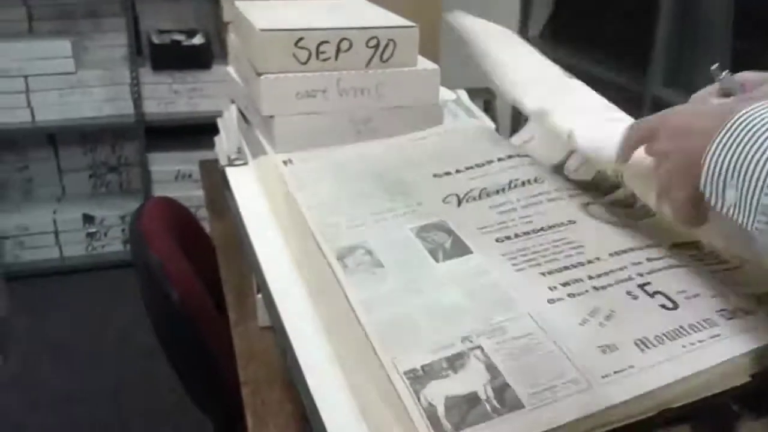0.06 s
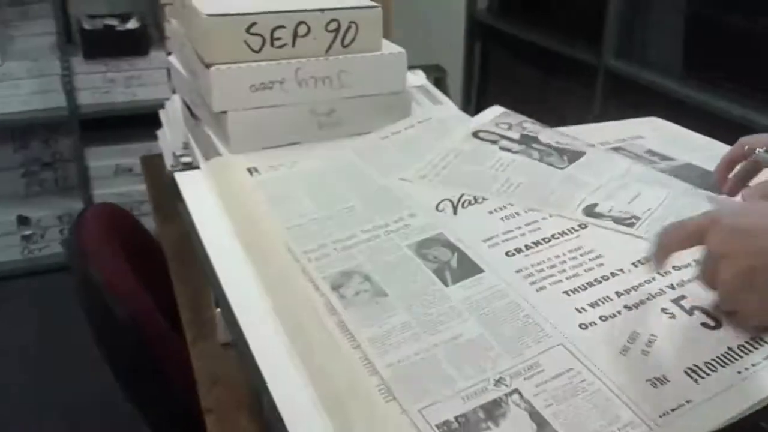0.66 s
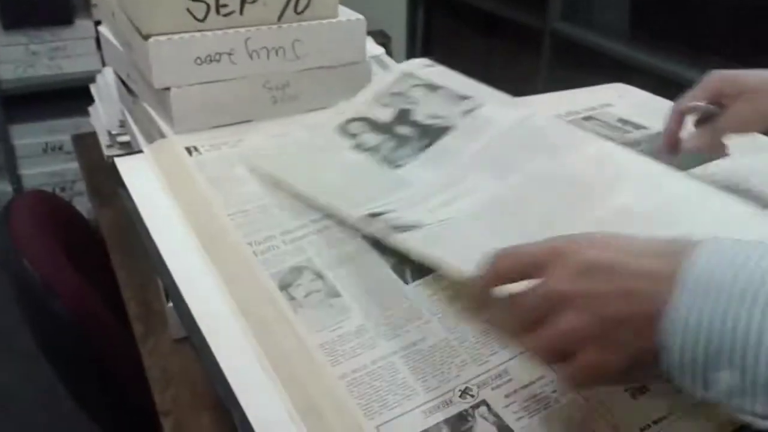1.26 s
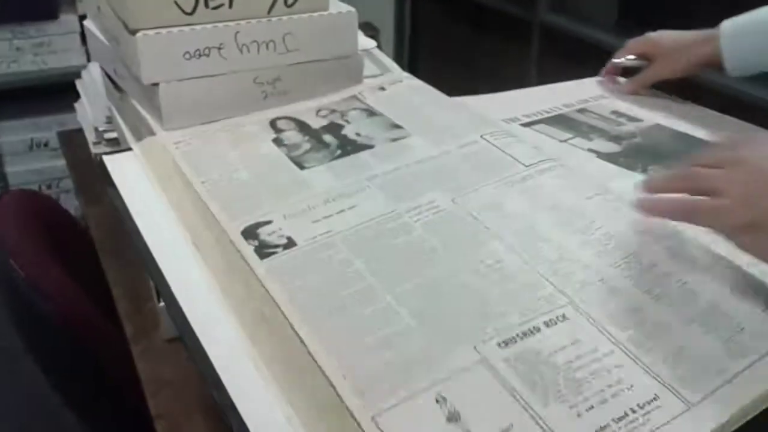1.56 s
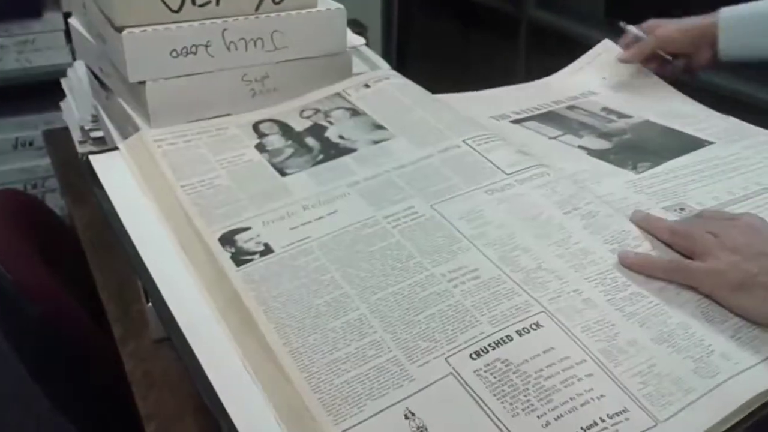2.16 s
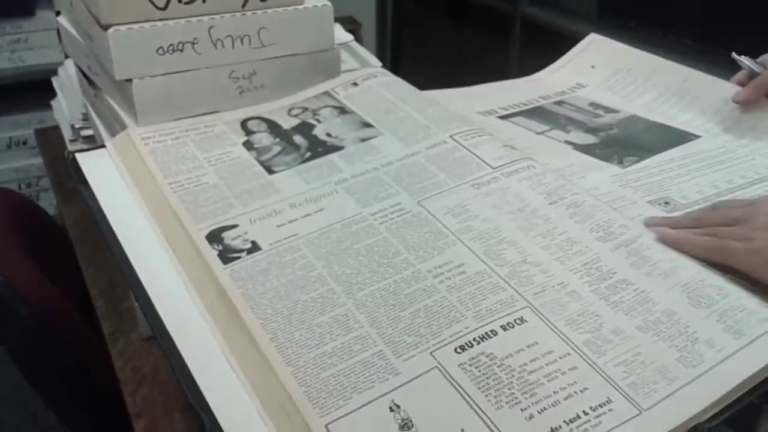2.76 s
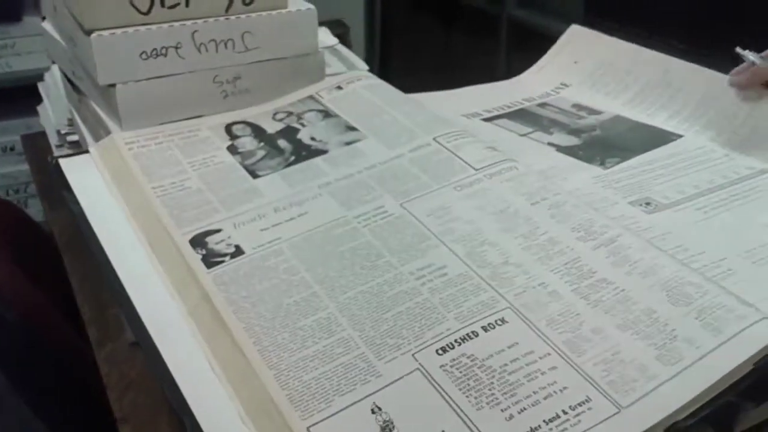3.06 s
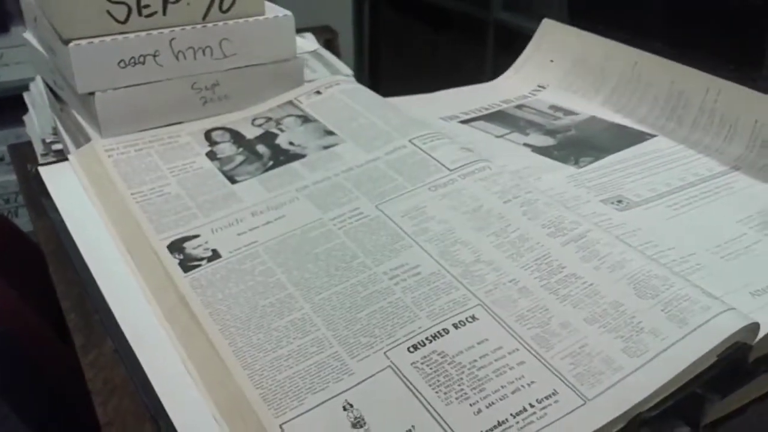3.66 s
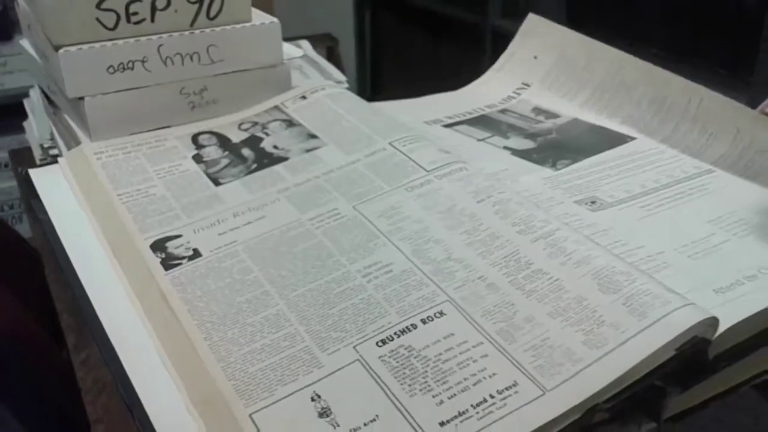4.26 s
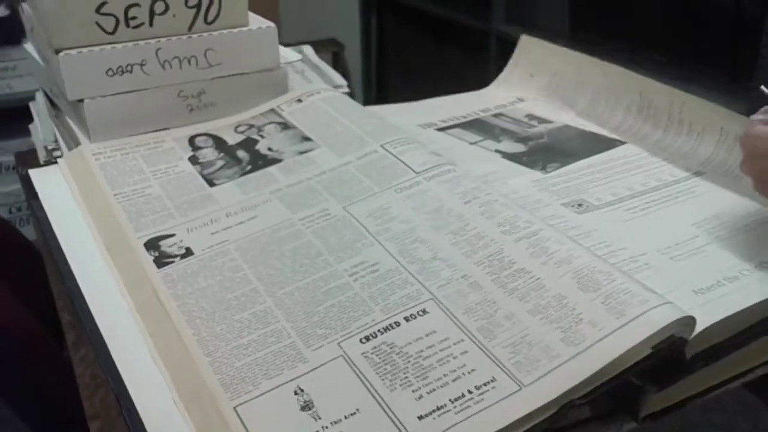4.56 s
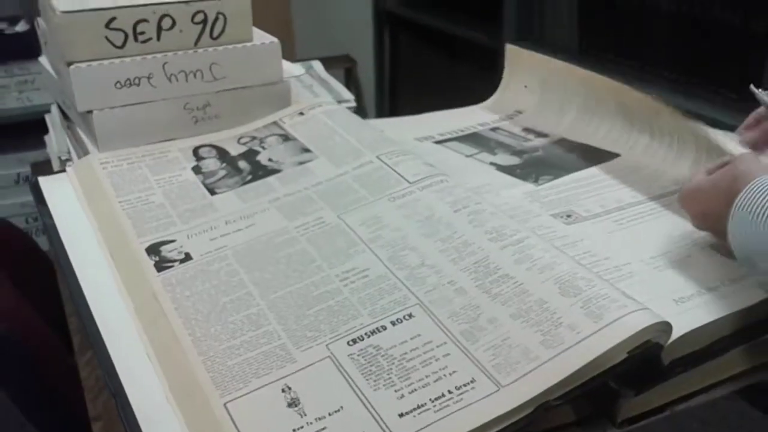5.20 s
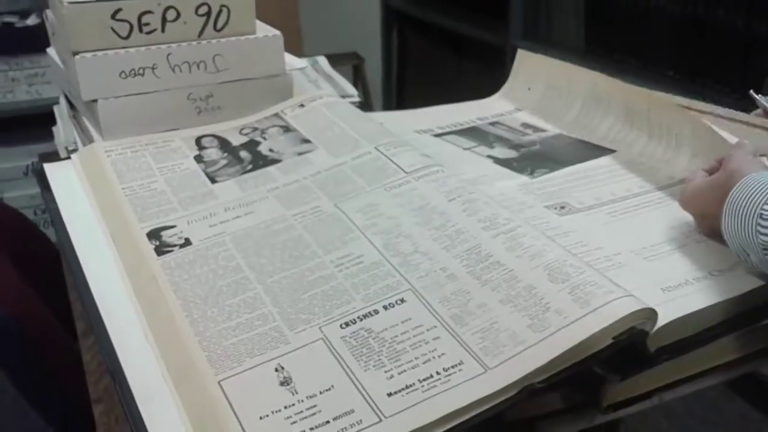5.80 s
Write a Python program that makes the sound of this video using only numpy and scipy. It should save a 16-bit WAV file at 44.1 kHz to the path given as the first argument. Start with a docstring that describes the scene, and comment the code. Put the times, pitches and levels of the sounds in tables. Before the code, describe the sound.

A large newspaper page is turned in a small, quiet room, crinkling and buckling with soft snaps before it settles with a puff of air. A hand slides faintly over the paper, and something hard taps lightly on a wooden stand. Near the end the camera is handled, and louder dry thumps, knocks, plastic ticks and finger rubs sound right at the microphone.

```python
"""Turning a newspaper page

In a small archive room a large page is lifted, buckles with soft snaps and settles on a bound volume.
A hand slides faintly over the newsprint and something hard clacks on the wooden stand.
Then a camera is handled: dry thumps, knocks and ticks come through its case, and skin rubs on it."""
import sys
import numpy as np
from scipy import signal
from scipy.fft import rfft, irfft, next_fast_len
from scipy.io import wavfile
from scipy.ndimage import uniform_filter1d, minimum_filter1d, map_coordinates

SR = 44100
rng = np.random.default_rng(int(sys.argv[2]) if len(sys.argv) > 2 else 0)


def master(y):
    """Save y as 16-bit WAV."""
    cut = np.clip(np.atleast_2d(y).T, -1, 1)
    pcm = np.round(cut * 32767)  # scale
    wavfile.write(sys.argv[1], SR, pcm.astype(np.int16))


N = 261821

# The gesture of the page turn (time [s], motion level [dB])
PAGE_MOTION = [(0.0, -40.5), (0.16, -32), (0.274, -35.5), (0.576, -43), (0.876, -44.5), (1.046, -41),
               (1.208, -33.5), (1.302, -32), (1.372, -35.5), (1.528, -44), (1.658, -52), (1.8, -82)]
# Hard bends of the sheet (start [s], hold [s], relative crinkle [dB], relative flap [dB])
BENDS = [(0.07, 0.11, -27, -33), (0.34, 0.091, -52, -31.5), (0.62, 0.0067, -29.5, -44),
         (0.773, 0.053, -43, -39.5), (0.994, 0.014, -36, -44), (1.085, 0.089, -38.5, -51),
         (1.309, 0.031, -32, -31.5), (1.375, 0.048, -45, -33.5), (1.633, 0.007, -64, -55)]
# Paper colours: hollow flap, crisp crinkle, sharp bite, low whoosh (frequency [Hz], gain [dB])
FLAP_EQ = [(250, -18.5), (430, -11.5), (520, 0.5), (600, 7), (710, -5), (880, 4), (1130, 6), (1350, -8),
           (1600, -14), (2000, -17), (3000, -28)]
CRINKLE_EQ = [(900, -34), (1500, 6), (1950, -5), (2400, 3.5), (2850, 0.5), (3250, -11.5), (4200, -15.5),
              (5300, -15.5), (6200, -30.5), (7500, -42)]
BITE_EQ = [(2900, -8), (3500, 2), (4300, 2.5), (5300, -2.5), (6200, -20), (7500, -18), (8800, -30)]
AIR_EQ = [(45, -19), (100, -10.5), (150, -9.5), (320, -3.5), (450, -6.5), (650, -1), (1500, -92)]
# Faint, high background hiss (frequency [Hz], gain [dB])
HISS_EQ = [(4000, 15), (8000, -1.5), (15000, -7.5)]
def page():
    """The moving sheet flaps and pushes air; bends crinkle it; its fall ends in a whoosh."""
    motion, = gains(PAGE_MOTION)
    motion = motion * envelope(0, attack=0.002, hold=PAGE_MOTION[-1][0], t60=0.053)
    speed = motion / motion.max()
    crinkle = amp(-44) * speed ** 0.65
    flap = amp(-0.5) * motion
    for start, hold, crinkle_db, flap_db in BENDS:
        bend = envelope(start, attack=0.0059, hold=hold, t60=0.31)
        crinkle = np.hypot(crinkle, amp(crinkle_db) * bend)
        flap = np.hypot(flap, amp(flap_db) * bend)
    flutter = unit(amp(1.5 * wobble(rate=55)))
    sheet = flap * rustle(FLAP_EQ, rate=700, smooth=0.82)
    brightness = amp(-24.5) * (crinkle / crinkle.max()) ** 0.067  # harder bends bite a little more
    bite = brightness * rustle(BITE_EQ, rate=1200, smooth=1)
    creases = amp(-6) * crinkle * (rustle(CRINKLE_EQ, rate=450, smooth=1) + bite)
    # the background hiss is a little louder during the page turn
    background_hiss = amp(-60) * speed ** 0.28 * unit(coloured(rng.standard_normal(N), HISS_EQ))
    # the falling page squeezes out the air beneath it
    fall = amp(-31) * envelope(start=1.12, attack=0.014, hold=0.097, t60=0.3)
    whoosh = np.hypot(amp(-7) * motion, fall) * rustle(AIR_EQ, rate=320, smooth=1)
    return flutter * (sheet + creases) + background_hiss + whoosh


# Buckling accents (time [s], relative level [dB], treble against body [dB])
SNAPS = [(0.068, -20, -7.5), (0.089, -14.5, -21), (0.117, -16, -0.5), (0.137, -12.5, -5.5),
         (0.173, -12.5, -8.5), (0.189, -12, -22), (0.348, -19.5, -30), (0.418, -20, -35),
         (0.624, -15, -10.5), (0.647, -25.5, 0), (0.784, -24.5, -3.5), (0.804, -23.5, -7), (0.953, -26, -8),
         (1.003, -16.5, -16), (1.063, -14, -5), (1.121, -19, -5), (1.193, -16, -10), (1.254, -26, -33),
         (1.315, -18, -20), (1.335, -11.5, -9.5), (1.474, -17.5, -24), (1.521, -23.5, -17),
         (1.583, -27, -11), (1.653, -27.5, -5)]
def snaps():
    """Each buckle is a burst that rattles out across the sheet; the sharper it is, the more it bites."""
    out = np.zeros(N)
    t = np.arange(SR // 6) / SR
    fade = decay(t, t60=0.06) + 0.28 * decay(t, t60=0.31)
    for start, db, treble_db in SNAPS:
        body, edge, bite = [unit(coloured(fade * rng.standard_normal(len(t)), eq))
                            for eq in (FLAP_EQ, CRINKLE_EQ, BITE_EQ)]
        bite_db = min(6.5 + 0.74 * (db + treble_db), -1)
        snap = body + amp(treble_db) * (edge + amp(bite_db) * bite)
        add(out, start, amp(db - 21) * unit(snap))
    return out


# Hard hits on the camera (time [s], contact level [dB], contact pitch [Hz], body level [dB],
# body pitch [Hz], click level [dB])
KNOCKS = [(3.8619, -22, 228, -21, 143, -60), (4.8206, -12.5, 1050, -13, 240, -30.5),
          (5.0470, -3, 1150, -11, 176, 7), (5.2344, -8, 428, -15.5, 192, -22),
          (5.3869, 0.5, 1080, -8.5, 126, -30), (5.3973, -21, 1150, -19, 120, -41),
          (5.587, -16, 660, -48, 203, -27), (5.769, -19.5, 1040, -18.5, 115, -38),
          (5.8355, -1.5, 560, -5, 83.5, -22.5), (5.874, -11, 1110, 1.5, 83.6, -29)]
def knocks():
    """A hard contact clicks and knocks, then the whole camera body swings after it."""
    out = np.zeros(N)
    body_lag_s = 0.00045
    for start, db, hz, body_db, body_hz, click_db in KNOCKS:
        contact = amp(db) * blow(hz, cycles=0.43, rattle_db=-25)
        add(out, start, contact + amp(click_db) * click(hz=2900))
        add(out, start + body_lag_s, amp(body_db) * blow(body_hz, cycles=0.5, rattle_db=-26.5))
    return out


# Soft, bassy bumps (time [s], level [dB], pitch [Hz])
THUMPS = [(0.268, -35.5, 78), (1.43, -37.5, 78.5), (3.809, -34, 91), (4.037, -36.5, 119),
          (4.496, -38.5, 92), (4.664, -31, 143), (4.715, -34, 75), (4.842, -18, 148), (4.883, -22.5, 215),
          (4.913, -17, 187), (4.989, -17, 159), (5.116, -21, 200), (5.259, -19, 138), (5.29, -19, 260),
          (5.4313, -24.5, 152), (5.4674, -25, 92), (5.5352, -29, 135), (5.8515, -7.5, 115)]
def thumps():
    """Soft low thumps: first the page's draught on the microphone, later fingertips on the case."""
    out = np.zeros(N)
    for start, db, hz in THUMPS:
        add(out, start, amp(db) * blow(hz, cycles=0.4, rattle_db=-28.5))
    return out


# Boxy colour of the rattle (frequency [Hz], gain [dB])
RATTLE_EQ = [(200, 16.5), (450, 3.5), (750, -1), (1200, 0.5), (1700, -15), (2200, -10.5), (3200, -13),
             (5500, -47)]
def blow(hz, cycles, rattle_db):
    """One damped swing with a brief rattle; the higher the pitch, the brighter the rattle."""
    t = np.arange(SR // 8) / SR
    rattle = unit(coloured(burst(t, t60=0.038), RATTLE_EQ))
    rattle = filtered(rattle, lambda f: 1 / (1 + 1j * f / (2 * hz)))
    return pulse(hz, cycles) + amp(rattle_db) * rattle


def pulse(hz, cycles):
    """A heavily damped swing whose envelope peaks after the given number of cycles."""
    turns = np.arange(SR // 8) / SR * hz
    return -turns / cycles * np.exp(1 - turns / cycles) * np.sin(2 * np.pi * turns)


# Clear plastic ticks (time [s], relative level [dB], pitch [Hz])
TICKS = [(5.0537, -6.5, 3900), (5.2576, -21.5, 3300), (5.2727, -17.5, 3320), (5.2894, -20, 2800),
         (5.3041, -18, 3450), (5.3222, -17, 3230), (5.3332, -20, 3260), (5.6358, -27.5, 3570),
         (5.6866, -17, 2900), (5.7218, -24.5, 4300), (5.7316, -23.5, 4080), (5.8306, -19.5, 2900)]
def ticks():
    """The case slips as the grip tightens: a few clear ticks among fainter random ones."""
    out = np.zeros(N)
    faint = [(rng.uniform(5.25, 5.87), rng.normal(-36.5, 3), 3800 * amp(rng.normal(0, 2)))
             for _ in range(8)]
    for start, db, hz in list(TICKS) + faint:
        add(out, start, amp(db - 1.5) * click(hz))
    return out


def click(hz):
    """Plastic slips: a tiny click with a dull push and a trace of fizz."""
    t = np.arange(SR // 8) / SR
    fizz_eq = [(900, -10), (1600, 9), (4200, 5.5), (7000, -21), (10500, -12.5)]
    fizz = coloured(burst(t, t60=0.0058), fizz_eq)
    push = amp(-4.5) * pulse(hz=910, cycles=0.22)
    slip = pulse(hz, cycles=0.44) + push + amp(-10.5) * fizz / np.abs(fizz).max()
    return filtered(slip, lambda f: lowpass(f, corner_hz=8300, damping=1.1))


# Fingers shifting on the camera (time [s], relative pressure [dB], relative sliding [dB])
GRIP = [(4.4, -54.5, -68), (4.796, -48.5, -71.5), (4.932, -39, -63), (5.038, -32, -47.5),
        (5.15, -43.5, -54.5), (5.282, -37.5, -52.5), (5.732, -44.5, -53.5), (5.814, -30.5, -55),
        (5.93, -38, -60)]
# Low, middle and high colours of the grip (frequency [Hz], gain [dB])
RUMBLE_EQ = [(25, -2.5), (70, 3), (170, -7), (300, -8.5), (600, -21.5)]
RUB_EQ = [(200, -10.5), (400, 1.5), (550, -0.5), (750, -2.5), (1100, -1), (1600, -8.5), (3000, -60)]
SKIN_EQ = [(1500, -1.5), (2700, 7), (3800, 3.5), (5400, -2), (6500, -12), (8000, -15), (10000, -22)]
def grip():
    """Skin creeps over the case: pressure makes a lumpy rumble, sliding a hiss, and both a dull rub."""
    pressure, sliding = gains(GRIP)
    rumble = amp(2) * pressure * rustle(RUMBLE_EQ, rate=120, smooth=0.44)
    rub = amp(-3) * np.sqrt(pressure * sliding) * rustle(RUB_EQ, rate=510, smooth=0.57)
    hiss = amp(-0.7) * sliding * rustle(SKIN_EQ, rate=1400, smooth=0.39)
    return rumble + rub + hiss


# Short scuffs, a clack's hissing tail and a knock's rattle (midpoint [s], length [s], level [dB], pitch [Hz],
# bandwidth [Hz])
RUBS = [(2.702, 0.18, -54, 482, 179), (4.796, 0.046, -46.5, 480, 160), (4.996, 0.045, -51.5, 5660, 2600),
        (5.188, 0.044, -44.5, 1010, 450), (5.549, .12, -45.5, 980, 320), (5.607, 0.35, -69, 8300, 1100),
        (5.656, 0.38, -66.5, 5300, 2200), (5.746, 0.16, -37.5, 352, 140), (5.833, .01, -30.5, 1030, 550),
        (5.874, .08, -39, 1220, 690)]
def rubs():
    """Skin and cuff catch and rub, a hard tap on the stand trails off in a hiss, and the heaviest knock on the
    camera rattles; each is a band of noise that swells and fades."""
    out = np.zeros(N)
    for middle, length, db, hz, width in RUBS:
        swell = np.hanning(int(length * SR))
        band = filtered(rng.standard_normal(len(swell)), lambda f: abs(resonance(f, hz, width)) ** 2.03)
        add(out, middle - length / 2, amp(db) * unit(band * swell))
    return out


# Hard taps on the stand (time [s], relative level [dB], brightness [dB])
CLACKS = [(2.757, -41, -27), (2.969, -40, -32), (3.497, -39, -20.5), (3.571, -39, -23), (4.297, -20.5, -13),
          (4.344, -25, -18), (4.975, -19, -10.5)]
# The stand's woody ring (frequency [Hz], bandwidth [Hz], gain [dB])
STAND_MODES = [(265, 93, -8), (576, 102, -4.5), (1027, 122, -0.5), (1720, 410, -13.5), (2310, 370, -8),
               (2750, 300, -3.5), (3850, 560, -12), (5200, 740, -10)]
def clacks():
    """A contact and its softer chatter ring the wooden stand; soft contacts leave the high modes still."""
    def wood(f):
        return sum((-1) ** k * amp(db) * resonance(f, hz, width)
                   for k, (hz, width, db) in enumerate(STAND_MODES))

    out = np.zeros(N)
    t = np.arange(SR // 6) / SR
    for start, db, brightness_db in CLACKS:
        chatter = filtered(burst(t, t60=0.075), lambda f: 1 / (1 + 1j * f / 2200))
        contact = (t == 0) + 0.16 * chatter
        corner_hz = 9500 * amp(0.89 * brightness_db)
        ring = filtered(contact, lambda f: wood(f) * lowpass(f, corner_hz, damping=1.3))
        add(out, start + 0.001095, amp(db - 15.5) * unit(ring))
    return out


# Palm strokes (midpoint [s], length [s], relative rub [dB], relative hiss [dB])
STROKES = [(1.862, 0.1, -51.5, -65.5), (2.035, 0.052, -51, -58.5), (2.39, 0.36, -53, -69),
           (2.94, 1, -59, -66.5), (3.45, 0.51, -51.5, -64), (4.293, 0.12, -45, -62), (4.652, .08, -49, -60)]
# Dry whisper of skin on paper (frequency [Hz], gain [dB])
PALM_EQ = [(1200, -34), (2000, -13.5), (2550, 2.5), (3300, -17), (4400, -9.5), (5300, -6), (6300, -26),
           (9000, -56)]
def palm_slide():
    """A palm drags lightly across newsprint; each stroke swells and fades."""
    rub, hiss = np.zeros(N), np.zeros(N)
    for middle, length, rub_db, hiss_db in STROKES:
        swell = np.sqrt(np.abs(np.hanning(int(length * SR))))
        add(rub, middle - length / 2, amp(rub_db) * swell)
        add(hiss, middle - length / 2, amp(hiss_db) * swell)
    rub *= amp(-4) * rustle(FLAP_EQ, rate=480, smooth=0.33)
    hiss *= amp(1) * rustle(PALM_EQ, rate=3500, smooth=0.3)
    return rub + hiss


# A tight room, lingering most in the bass (frequency [Hz], time to fall 60 dB [s])
ROOM_T60 = [(200, 0.4), (1000, 0.16), (3000, 0.2), (10000, 0.19)]
def in_room(x, wet_db):
    """Adds the short tail of a room full of shelves, at unchanged power."""
    hz, t, noise = signal.stft(rng.standard_normal(SR // 2), SR, nperseg=256)
    fade = decay(t, along(ROOM_T60, hz)[:, None])
    build_up = 1 - np.exp(-t / 0.017)
    _, tail = signal.istft(noise * fade * build_up, SR, nperseg=256)
    wet = signal.fftconvolve(x, tail / np.linalg.norm(tail))[:N]
    return (x + amp(wet_db) * wet) / np.hypot(1, amp(wet_db))


# The dark bed under everything (frequency [Hz], gain [dB])
ROOM_TONE_EQ = [(12, -21.5), (20, 0), (80, -5), (116, -5), (180, -4), (219, -6), (439, -14), (597, -14),
                (649, -20.5), (811, -19), (1070, -19.5), (1410, -23.5), (2540, -27.5), (6360, -40.5),
                (15500, -45.5)]
def room_tone():
    """Steady ventilation and a little microphone hiss."""
    return amp(-50) * unit(coloured(rng.standard_normal(N), ROOM_TONE_EQ))


def rustle(eq, rate, smooth):
    """Tiny slips of random size, rate a second, over a smooth share of friction noise; rms 1."""
    slips = (rng.random(N) < rate / SR) * rng.standard_normal(N)
    return unit(coloured(unit(slips) + smooth * rng.standard_normal(N), eq))


def amp(db):
    """Decibels to gain."""
    return 10 ** (np.asarray(db) / 20)


def unit(x):
    """Scaled to rms 1."""
    return x / np.sqrt(np.mean(x ** 2) + 1e-20)


def along(points, hz):
    """Reads (frequency [Hz], value) points on a log axis."""
    freqs, values = np.transpose(points)
    return np.interp(np.log(hz + 1), np.log(freqs + 1), values)


def gains(rows):
    """One fader curve for each dB column, silent before the first row."""
    times, *columns = np.transpose(rows)
    return [amp(np.interp(np.arange(N) / SR, times, db, left=-120)) for db in columns]


def decay(t, t60):
    """Falls 60 dB every t60 seconds."""
    return amp(-60 * t / t60)


def burst(t, t60):
    """White noise that dies away."""
    return rng.standard_normal(len(t)) * decay(t, t60)


def envelope(start, attack, hold, t60):
    """A straight rise, a hold and an exponential release, all in seconds."""
    t = np.arange(N) / SR - start
    return np.clip(t / attack, 0, 1) * decay(np.maximum(t - attack - hold, 0), t60)


def wobble(rate):
    """A smooth random curve, rate knots a second."""
    knots = rng.standard_normal(int(N * rate / SR) + 4)
    return map_coordinates(knots, [np.arange(N) * rate / SR])


def resonance(f, hz, width):
    """Band-pass response of one mode."""
    return 1j * f * width / (hz ** 2 - f ** 2 + 1j * f * width)


def lowpass(f, corner_hz, damping):
    """Response of a two-pole treble roll-off."""
    return 1 / (1 + 1j * damping * f / corner_hz - (f / corner_hz) ** 2)


def filtered(x, response):
    """x through a complex frequency response."""
    size = next_fast_len(len(x) + SR // 4)
    return irfft(rfft(x, size) * response(np.fft.rfftfreq(size, 1 / SR)), size)[:len(x)]


def coloured(x, eq, size=4096):
    """x through a causal filter with the given EQ curve, falling away steeply beyond its ends."""
    hz = np.fft.rfftfreq(size, 1 / SR) + 1
    skirts = np.minimum(hz / eq[0][0], 1) * np.minimum(eq[-1][0] / hz, 1)
    cepstrum = irfft(np.log(amp(along(eq, hz)) * skirts ** 3 + 1e-6))
    cepstrum[1:size // 2] *= 2  # minimum phase keeps attacks sharp
    cepstrum[size // 2 + 1:] = 0
    impulse = irfft(np.exp(rfft(cepstrum)))
    return signal.fftconvolve(x, impulse)[:len(x)]


def add(track, start, sound):
    """Mixes a sound into the track at start seconds."""
    part = track[round(start * SR):][:len(sound)]
    part += sound[:len(part)]


def scene():
    """Paper and stand sound through the room; thumps and handling reach the microphone dry."""
    paper = in_room(page() + palm_slide() + snaps(), wet_db=-9.5)
    stand = in_room(clacks(), wet_db=-10.5)
    close_up = rubs() + thumps() + knocks() + ticks() + grip()
    return (paper + stand + close_up + room_tone())[None]


def record(dry):
    """The microphone sheds deep bass, a fast limiter holds the hardest knocks, and the top is cut off."""
    low_cut_hz, top_hz, limiter_samples = 42, 15550, 41
    x = filtered(dry[0], lambda hz: hz / np.hypot(hz, low_cut_hz))
    safe_gain = 1 / np.maximum(np.abs(x), 1)
    gain = uniform_filter1d(minimum_filter1d(safe_gain, limiter_samples), limiter_samples)
    return filtered(x * gain, lambda hz: hz < top_hz)[None]


dry = scene()
out = record(dry)
master(out)
```